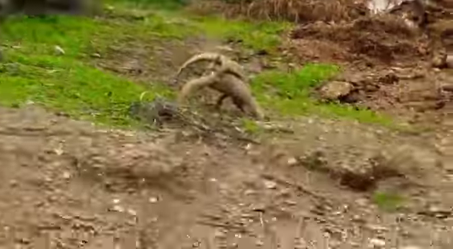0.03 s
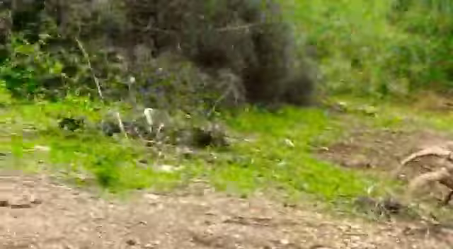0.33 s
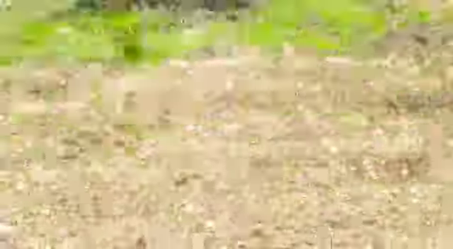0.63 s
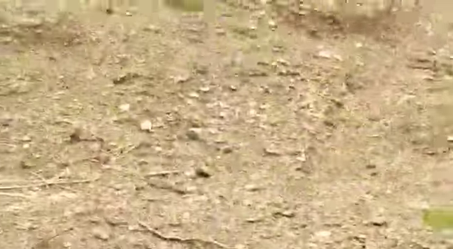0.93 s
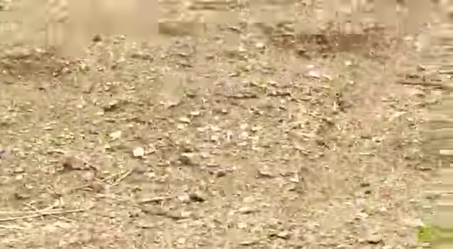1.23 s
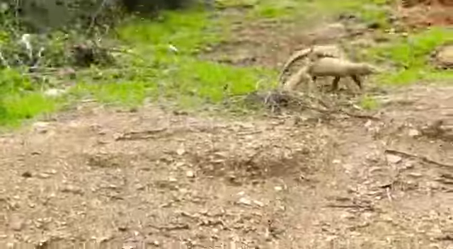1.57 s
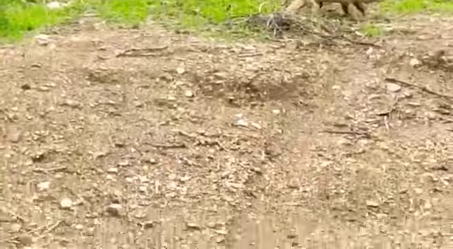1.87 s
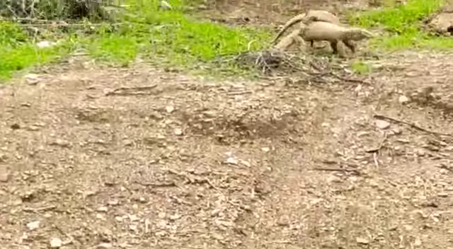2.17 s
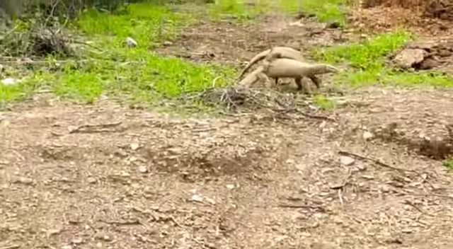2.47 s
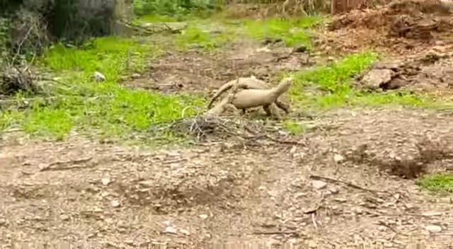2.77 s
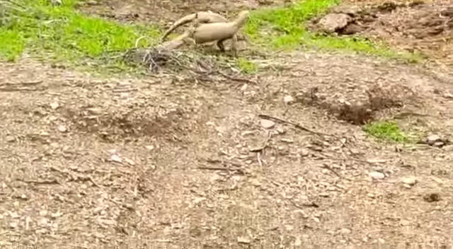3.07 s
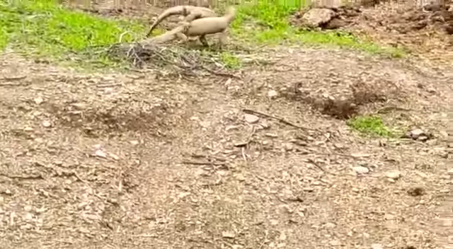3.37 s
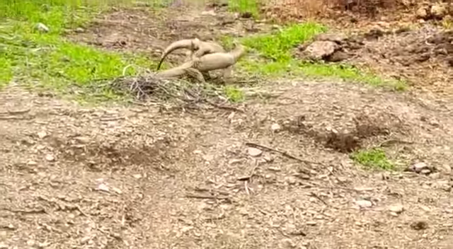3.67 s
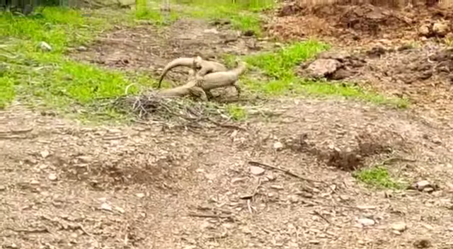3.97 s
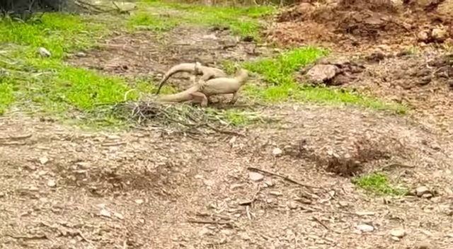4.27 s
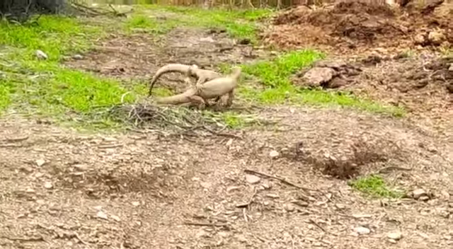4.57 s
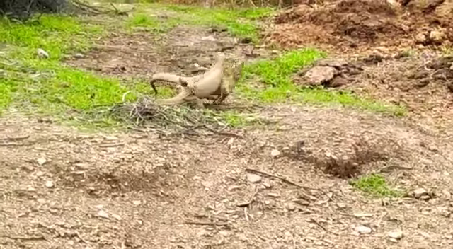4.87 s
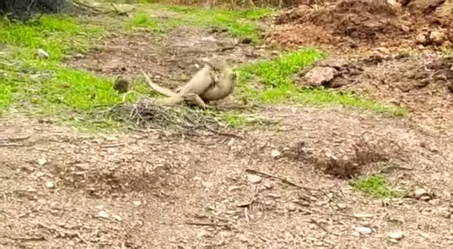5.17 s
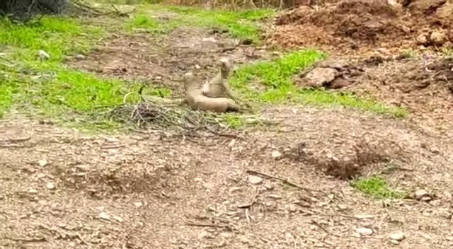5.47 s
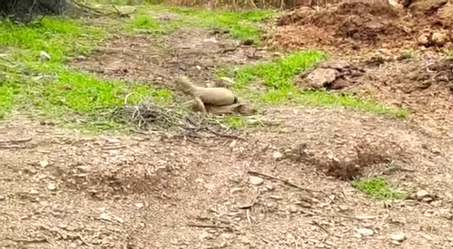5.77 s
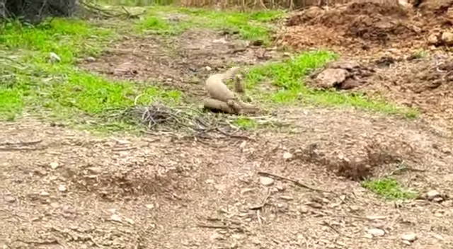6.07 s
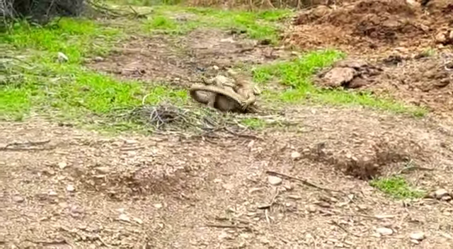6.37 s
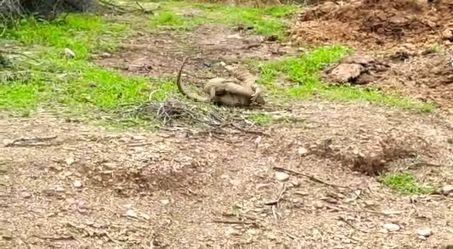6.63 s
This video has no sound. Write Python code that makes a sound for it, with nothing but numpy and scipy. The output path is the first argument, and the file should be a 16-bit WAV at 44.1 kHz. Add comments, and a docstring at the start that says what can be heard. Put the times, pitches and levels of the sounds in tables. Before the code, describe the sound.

Fingers click, rub and thump on a camera right at the microphone, loud enough to overload it briefly. The handling stops, leaving a quiet clearing with a soft hush of leaves. A small distant bird repeats faint, high rising whistles while wind buffets the microphone in low puffs. Toward the end two animals scuffle in dry litter with light crackles and twig snaps, and the wind returns.

```python
"""A quiet clearing, heard through a camera that is being handled. Fingers click on the case, rub it
with stick-slip friction and press on the microphone port until it overloads and pips. Wind buffets the
port in turbulent puffs, a small far bird gives rising whistles, and two animals scuffle in dry litter,
whose crackle is a sum of tiny impacts. Under it all lie a hush of distant leaves, blended birdsong
and two soft hums."""
import sys
import numpy as np
from scipy import signal
from scipy.fft import rfft, irfft, next_fast_len
from scipy.io import wavfile
from scipy.ndimage import uniform_filter1d, map_coordinates

SR = 44100
rng = np.random.default_rng(int(sys.argv[2]) if len(sys.argv) > 2 else 0)


def unload_audio(sound):
    """Save the sound as a 16-bit wav file, at the path given as the first command line argument."""
    columns = np.transpose(np.atleast_2d(sound))
    # keep every value between -1 and 1, then stretch to whole-number steps
    steps = np.round(np.clip(columns, -1, 1) * 32767)
    wavfile.write(sys.argv[1], SR, steps.astype(np.int16))


N = 295470

# Spectrum of distant leaves and birds: frequency_hz, density_db
HUSH_SPECTRUM = [(120, -32), (200, -3.5), (268, -11.5), (328, -10), (409, -16.5), (623, -17), (683, -18.5),
                 (821, -22), (1080, -25.5), (2510, -24.5), (4350, -26.5), (5420, -19), (7140, -25),
                 (10500, -25.5), (16000, -31)]
# Spectrum of many far birds blended: frequency_hz, density_db
CHORUS_SPECTRUM = [(3500, -52.5), (4600, -19.5), (5100, -5), (5500, 0), (5900, -14.5), (6350, 0.5),
                   (7100, -17), (9000, -75)]
# Soft wavering hums: centre_s, level_db, length_s, pitch_hz
HUMS = [(.04, -42, .12, 159.1), (6.261, -66, 0.93, 338.3)]
# Fingers catching on the case: start_s, level_db, pitch_hz
CLICKS = [(0.0851, -14.5, 11900), (0.09, -14.5, 3050), (0.1065, -9, 5480), (0.1147, -3.5, 990),
          (0.1276, -5, 3600), (.1329, -5, 5900), (0.1635, -28, 7154), (0.2175, -8.5, 4070),
          (.2190, -4, 5200), (.2894, -12, 9150), (0.3344, -8, 4630), (0.3471, -15.5, 2680),
          (.3596, -8, 1280), (0.3902, -14.5, 3000), (0.3915, -3, 860), (0.4129, -13.5, 8300),
          (.4910, -33, 2050), (.5180, -22.5, 890), (0.836, -36, 2420), (0.8443, -36.5, 8150),
          (0.8897, -12, 8700), (.8897, -6.5, 1980), (1.3988, -12.5, 680), (1.4071, -25, 906),
          (1.4802, -40.5, 4500), (1.566, -35, 6600), (1.6314, -34.5, 7730)]
# Skin sliding on the case: start_s, end_s, level_db
RUBS = [(.088, .135, -40), (.135, .19, -51), (.208, .232, -43.5), (.272, .33, -55), (.33, .37, -45),
        (.395, .435, -50), (.435, .555, -53.5), (.585, .685, -55), (.832, .975, -62.5),
        (1.065, 1.11, -61.5), (1.115, 1.21, -53.5), (1.24, 1.322, -50.5)]
# Spectrum of skin friction: frequency_hz, density_db
SKIN_SPECTRUM = [(150, -4), (350, 5), (700, -1), (1100, -4), (1600, -5), (2500, -10), (4800, -13.5),
                 (7000, -13.5), (14000, -16), (16000, -27)]
# Soft blows of the hand on the camera body: start_s, level_db, pitch_hz, t60_s
BUMPS = [(.0885, 0.5, 157, 0.0096), (.2112, -15, 473, 0.025), (.336, -4.5, 133, 0.028),
         (.365, -9.5, 89, 0.061), (.3925, -10, 77.5, 0.047), (.651, -14, 71, 0.028),
         (.781, -8.5, 59.6, 0.025), (.891, -10, 69.4, 0.053), (.976, -13, 51.4, 0.031),
         (1.226, -13.5, 81, 0.019), (1.299, -20.5, 79.5, 0.048), (1.3435, -15.5, 70.6, 0.013),
         (1.3975, 0, 125, 0.0089)]
# Spectrum of slow finger pressure on the port: frequency_hz, density_db
PRESSURE_SPECTRUM = [(4, -2), (10, 2.5), (28, -8), (50, -16.5), (100, -30.5), (200, -45), (500, -76.5),
                     (1000, -120)]
# Natural modes of the case: pitch_hz, level_db, t60_s
CASE_MODES = [(468, -0.5, 0.016), (759, -18.5, 0.032), (1381, -11.5, 0.019), (2460, -11.5, 0.015),
              (3320, -28, 0.029), (3870, -15, 0.019), (4791, -15.5, 0.017), (5319, -13, 0.026)]
# Pips under the hardest presses: start_s, level_db
OVERLOADS = [(0.656, -41.5), (0.704, -46), (0.786, -38.5), (0.894, -42), (.911, -47), (.981, -43),
             (1.227, -40), (1.3453, -44.5), (1.400, -41)]
# A far bird's series of whistles, slowing down: top_s, level_db
WHISTLES = [(1.675, -71), (1.895, -63), (2.115, -65), (2.35, -72.5), (2.585, -64.5), (2.82, -63.5),
            (3.066, -74), (3.314, -69), (3.59, -71), (4.165, -68), (4.509, -70.5)]
# Contour of one whistle around its highest pitch: from_top_s, pitch_hz, relative_db
WHISTLE_CONTOUR = [(-.14, 5630, -14.5), (-.06, 6064, -13), (-.02, 6480, -5), (0, 7010, -14),
                   (0.013, 6760, -2.5), (.035, 6710, -11)]
# Other birds' notes: centre_s, level_db, length_s, start_hz, end_hz
BIRD_NOTES = [(2.06, -61.5, 0.063, 6090, 6240), (2.447, -82, 0.32, 1780, 1770),
              (2.512, -65, .04, 5230, 4820), (2.554, -82.5, 0.69, 2610, 2585),
              (3.097, -69.5, .06, 6200, 6280), (3.345, -72, 0.029, 3050, 2900),
              (3.45, -70, .05, 4800, 4660), (3.533, -75.5, 0.33, 835, 825), (3.543, -77, 0.27, 2464, 2476),
              (4.238, -66, .06, 6470, 6580), (4.403, -74, .03, 3910, 4200), (4.512, -73, .03, 3940, 4040),
              (5.376, -65, .03, 5090, 4950), (5.401, -64.5, .03, 5170, 4790)]
# Moves of the animals in the litter: peak_s, level_db, rise_s, fall_s
ANIMAL_MOVES = [(2.85, -75, 0.16, .1), (2.984, -57.5, 0.025, 0.039), (3.83, -69.5, .15, .08),
                (4.1, -76, .03, 0.48), (4.76, -74, .04, 0.049), (4.89, -66, 0.0053, 0.09),
                (5.1, -63.5, 0.013, 0.086), (5.3, -70, .03, 0.052), (5.41, -63, 0.0046, 0.076),
                (5.51, -60, 0.028, 0.052), (5.88, -58, 0.33, .24), (6.161, -57, .02, .03),
                (6.46, -64, 0.21, 0.15)]
# Spectrum of crackling dry leaves: frequency_hz, density_db
LITTER_SPECTRUM = [(530, -36), (900, -9), (1880, -4.5), (2330, -10), (3680, -6), (4150, -17.5), (4920, -4),
                   (5480, -9.5), (9420, 1), (13400, -5), (16000, -14)]
# Twigs and grit snapping: start_s, peak_db, pitch_hz, quality_factor
SNAPS = [(1.9593, -41.5, 1504, 0.23), (2.9111, -49.5, 1520, 0.99), (2.9739, -49, 1400, 0.87),
         (4.0708, -44.5, 8240, 2.3), (4.6777, -45.5, 10890, 1.54), (4.7602, -44.5, 7170, 1.5),
         (4.8909, -49, 7960, 1), (5.4446, -46.5, 1576, 0.63), (5.4880, -44, 10000, 1.7),
         (5.5254, -46.5, 12800, 1.7), (5.627, -46.5, 1700, 0.7), (5.8797, -40, 12000, 1.1),
         (5.88, -50.5, 900, .4), (5.9055, -37, 3580, 3.4), (5.9062, -35, 10800, 1.2),
         (6.0445, -47, 9080, 2.5), (6.5940, -53, 13000, 1.7)]
# Feet scraping the soil: centre_s, level_db, half_width_s, centre_hz
SCUFFS = [(2.979, -66, 0.04, 2270), (4.754, -57.5, .03, 5986)]
# Gusts swelling over the breeze: peak_s, level_db, half_width_s
GUSTS = [(2.376, -43, 0.038), (2.533, -41, 0.099), (2.686, -34.5, 0.12), (2.865, -33, 0.13),
         (2.98, -32, 0.053), (3.136, -28.5, .05), (3.226, -33.5, 0.051), (3.382, -49.5, 0.066),
         (3.778, -54, 0.23), (5.624, -47.5, 0.1), (5.74, -38, .045), (5.831, -35.5, 0.046),
         (6.011, -44, 0.094), (6.63, -36, 0.093)]
# Spectrum of slow buffeting: frequency_hz, density_db
BUFFET_SPECTRUM = [(10, -20), (30, 4.5), (65, 2), (130, -6), (200, -16.5), (320, -33.5), (600, -67),
                   (1200, -100)]
# Spectrum of fast eddies: frequency_hz, density_db
EDDY_SPECTRUM = [(60, -25.5), (150, 8), (270, 3.5), (450, -9.5), (700, -29.5), (1100, -49), (2000, -60)]
# Single eddies hitting the port: centre_s, peak_db, pitch_hz
PUFFS = [(2.392, -32.5, 149.4), (2.506, -33.5, 127.6), (2.677, -26.5, 250), (2.796, -28.5, 204),
         (2.840, -25.5, 106.4), (2.885, -31, 300), (3.133, -19, 187), (3.139, -26, 215),
         (3.152, -19.5, 160), (3.227, -44, 257), (5.826, -27.5, 320), (6.005, -41, 150.4),
         (6.611, -32.5, 120), (6.652, -29, 180)]

TOUCH_S, GRIP_S, LET_GO_S = .11, .39, 1.39  # the hand rests on the port, grips, lets go


def amp(db):
    """Amplitude ratio of a level in decibels."""
    return 10 ** (np.asarray(db) / 20)


def unit(x):
    """Normalisation to rms 1."""
    return x / np.sqrt(np.mean(x ** 2) + 1e-20)


def add(track, start_s, sound):
    """Superposition: a sound adds to the track from start_s on."""
    start = round(start_s * SR)
    part = sound[max(-start, 0):max(N - start, 0)]
    track[max(start, 0):][:len(part)] += part


def wobble(rate_hz):
    """Slow random modulation: a spline through rate_hz Gaussian values a second."""
    return map_coordinates(rng.standard_normal(int(N * rate_hz / SR) + 4), [np.arange(N) * rate_hz / SR])


def envelope(start_s, end_s, attack_s, release_s):
    """Exponential growth up to start_s, a hold until end_s, then exponential decay."""
    t = np.arange(N) / SR
    return np.exp(np.minimum(t - start_s, 0) / attack_s - np.maximum(t - end_s, 0) / release_s)


def filtered(x, response):
    """Linear filtering: the spectrum of x is multiplied by a frequency response."""
    size = next_fast_len(len(x) + SR // 4)
    return irfft(rfft(x, size) * response(np.fft.rfftfreq(size, 1 / SR)), size)[:len(x)]


def coloured(x, spectrum):
    """Spectral shaping by a curve interpolated over log frequency, at rms 1."""
    knots_hz, db = np.transpose(spectrum)
    return unit(filtered(x, lambda hz: amp(np.interp(np.log(hz + 1), np.log(knots_hz + 1), db))))


def noise(spectrum):
    """Gaussian noise with a given spectral shape, at rms 1."""
    return coloured(rng.standard_normal(N), spectrum)


def resonance(x, hz, q):
    """Band-pass response of a damped oscillator with natural frequency hz and quality factor q."""
    return filtered(x, lambda f: 1j * f * hz / q / (hz ** 2 - f ** 2 + 1j * f * hz / q))


def grains(rate_hz, spread_db):
    """Shot noise: tiny random impacts of very unequal size, at rms 1."""
    sizes = amp(spread_db * np.minimum(rng.exponential(size=N), 4))
    return unit((rng.random(N) < rate_hz / SR) * sizes * rng.standard_normal(N))


def tone(pitch_hz, waver):
    """Frequency modulation: a sine strays from its pitch track by about the fraction waver."""
    unsteady_hz = pitch_hz * (1 + waver * wobble(150)[:len(pitch_hz)])
    return np.sin(2 * np.pi * np.cumsum(unsteady_hz) / SR)


def saturate(x, ceiling):
    """Soft clipping: linear for small signals, levelling off towards the ceiling."""
    return x / (1 + (x / ceiling) ** 6) ** (1 / 6)


def impacts(rows, grit, grit_life):
    """Impact excitation: a damped swing of the case, plus noise that lasts grit_life times as long."""
    out, t = np.zeros(N), np.arange(SR // 10) / SR
    for start_s, db, hz, t60_s in rows:
        swing = np.sin(2 * np.pi * hz * t) * amp(-60 * t / t60_s)
        hiss = resonance(resonance(rng.standard_normal(len(t)), hz, q=0.34), hz, q=0.17)
        crack = unit(hiss) * amp(-60 * t / (t60_s * grit_life))
        onset = 1 - np.exp(-t * hz * 12)  # softer, lower contacts take longer to build
        add(out, start_s, amp(db) * onset * (swing + grit * crack))
    return out


def distant_hush():
    """Incoherent summation: far leaves and birds merge into noise in which notes come and go."""
    spectrogram = signal.stft(noise(CHORUS_SPECTRUM), nperseg=1024)[2]
    patches = uniform_filter1d(rng.standard_normal(spectrogram.shape), size=3, axis=0)  # in frequency
    voices = unit(uniform_filter1d(patches, size=16, axis=1))  # and in time, to the length of a note
    chorus = unit(signal.istft(spectrogram * amp(4.4 * voices), nperseg=1024)[1][:N])
    hush = amp(-68 + 0.95 * wobble(2.6)) * noise(HUSH_SPECTRUM)
    return hush + amp(-78.5 + wobble(9.8)) * chorus


def hums():
    """Random frequency modulation makes a soft fundamental and its weak octave waver."""
    out = np.zeros(N)
    for centre_s, db, length_s, hz in HUMS:
        pitch_hz = np.full(int(length_s * SR), float(hz))
        hum = tone(pitch_hz, waver=0.065) + amp(-17.5) * tone(2 * pitch_hz, waver=0.024)
        add(out, centre_s - length_s / 2, amp(db) * np.sqrt(np.hanning(len(hum))) * hum)
    return out


def finger_clicks():
    """Damping grows with frequency: harder, higher contacts die away sooner."""
    t60_at_1khz_s = 0.0023
    rows = [(start_s, db, hz, t60_at_1khz_s * (hz / 1000) ** -0.46) for start_s, db, hz in CLICKS]
    return impacts(rows, grit=0.46, grit_life=1.5)


def skin_friction():
    """Sliding friction gives fine hiss with a few coarse catches; resting skin barely whispers."""
    resting = (TOUCH_S, LET_GO_S, -72.5)
    strokes = [amp(db) * envelope(start_s, end_s, attack_s=0.0045, release_s=0.0073)
               for start_s, end_s, db in [*RUBS, resting]]
    catches = grains(rate_hz=500, spread_db=4)
    texture = coloured(rng.standard_normal(N) + .45 * catches, SKIN_SPECTRUM)
    return np.max(strokes, axis=0) * amp(3 + 2.8 * wobble(80)) * texture


def port_pressure():
    """Saturation: finger pressure and soft blows drive the microphone beyond its linear range."""
    touch = amp(-29) * envelope(TOUCH_S, LET_GO_S, attack_s=.008, release_s=0.09)
    grip = amp(-14.5) * envelope(GRIP_S, LET_GO_S, attack_s=.03, release_s=0.022)
    pressure = np.maximum(touch, grip) * noise(PRESSURE_SPECTRUM)
    pressure += impacts(BUMPS, grit=0.3, grit_life=0.62)
    seal_s, leak_s = .1278, 0.025  # a fingertip shuts the port and the trapped pressure leaks away
    t = np.arange(SR // 4) / SR
    add(pressure, seal_s, amp(-10) * np.exp(-t / leak_s))
    return saturate(pressure, ceiling=.26)


def finger_stutter():
    """Stick-slip: a finger slips ever faster and harder, then leaves the case ringing in its modes."""
    first_slip_s, slip_hz, slip_t60_s, ring_s = .1991, 710, .008, .2154
    gaps_s = .0068 * .7 ** np.arange(5)
    starts_s = first_slip_s + np.cumsum([0, *gaps_s])
    slips = [(start_s, -12 + .5 * k, slip_hz, slip_t60_s) for k, start_s in enumerate(starts_s)]
    out = impacts(slips, grit=0.28, grit_life=0.94)
    t = np.arange(SR // 10) / SR
    ring = sum(amp(db - 60 * t / t60_s) * np.sin(2 * np.pi * hz * t) for hz, db, t60_s in CASE_MODES)
    add(out, ring_s, amp(-12) * ring)
    return out


def overload_pips():
    """Damped oscillation: the overloaded input whistles for a few milliseconds, with its octave."""
    pitch_hz, t60_s, attack_s = 6020, 0.015, 0.00091
    out, t = np.zeros(N), np.arange(SR // 20) / SR
    phase = 2 * np.pi * pitch_hz * t
    whistle = np.sin(phase) + amp(-5.5) * np.sin(2 * phase)
    pip = whistle * amp(-60 * t / t60_s) * (1 - np.exp(-t / attack_s))
    for start_s, db in OVERLOADS:
        add(out, start_s, amp(db) * pip)
    return out


def birds():
    """Whistles and notes are gliding pure tones; scattering by the bushes adds a reverberant tail."""
    calls = np.zeros(N)
    from_top_s, contour_hz, contour_db = np.transpose(WHISTLE_CONTOUR)
    t = np.arange(from_top_s[0], from_top_s[-1], 1 / SR)
    for top_s, db in WHISTLES:
        pitch_hz = np.interp(t, from_top_s, contour_hz) * (1 + rng.normal(0, 0.0029))
        gain = amp(db + np.interp(t, from_top_s, contour_db))
        add(calls, top_s + t[0], gain * tone(pitch_hz, waver=.005))
    for centre_s, db, length_s, start_hz, end_hz in BIRD_NOTES:
        note = tone(np.linspace(start_hz, end_hz, int(length_s * SR)), waver=0.0094)
        add(calls, centre_s - length_s / 2, amp(db) * np.hanning(len(note)) * note)
    t, t60_s = np.arange(SR // 2) / SR, 0.38
    tail = rng.standard_normal(len(t)) * amp(-60 * t / t60_s)
    return calls + amp(-8) * signal.fftconvolve(calls, tail / np.linalg.norm(tail))[:N]


def animals_in_litter():
    """Impulsive noise: dry leaves crackle under each move, twigs snap and feet scrape the soil."""
    crackle = grains(rate_hz=3500, spread_db=2.5) + .6 * grains(rate_hz=260, spread_db=3)
    moves = [amp(db) * envelope(peak_s, peak_s, rise_s, fall_s)
             for peak_s, db, rise_s, fall_s in ANIMAL_MOVES]
    out = np.linalg.norm(moves, axis=0) * coloured(crackle, LITTER_SPECTRUM)  # moves add in power
    t, snap_t60_s = np.arange(SR // 20) / SR, 0.024
    for start_s, db, hz, q in SNAPS:
        burst = rng.standard_normal(len(t)) * amp(-60 * t / snap_t60_s)
        snap = unit(resonance(resonance(burst, hz, q), hz, q)) + .35 * unit(burst)
        add(out, start_s + 0.00092, amp(db) * snap / np.abs(snap).max())
    for centre_s, db, half_width_s, hz in SCUFFS:
        stroke = np.exp(-((np.arange(N) / SR - centre_s) / half_width_s) ** 2)
        scrape = unit(resonance(grains(rate_hz=4000, spread_db=3), hz, q=0.26))
        out += amp(db) * stroke * scrape
    return out


def wind_gusts():
    """Turbulence: gusts over a breeze buffet the port and shed fast eddies at the pressure peaks."""
    t = np.arange(N) / SR
    gusts = [amp(db) * np.exp(-((t - peak_s) / half_width_s) ** 2) for peak_s, db, half_width_s in GUSTS]
    breeze = amp(-59)
    strength = np.hypot(breeze, np.linalg.norm(gusts, axis=0))
    buffet = noise(BUFFET_SPECTRUM)
    rumble = amp(3 + 1.1 * wobble(28)) * strength * buffet
    eddies = unit((0.24 + np.abs(buffet)) * amp(1.8 * wobble(60)) * noise(EDDY_SPECTRUM))
    eddy_gain = amp(-38.5) * (strength / amp(-30)) ** 1.7  # eddies grow 1.7 dB per dB of wind
    return rumble + eddy_gain * eddies


def wind_puffs():
    """A single eddy hits the port as a band-limited pulse: it holds nothing finer than its own size."""
    out, t = np.zeros(N), np.arange(-SR // 20, SR // 20) / SR
    half_width_s = 0.0055
    for centre_s, db, hz in PUFFS:
        burst = rng.standard_normal(len(t)) * np.exp(-(t / half_width_s) ** 2)
        puff = filtered(burst, lambda f: f * np.exp(-.5 * (f / hz) ** 2))
        add(out, centre_s + t[0], amp(db) * puff / np.abs(puff).max())
    return out


def scene():
    """Superposition: all sources add at the one microphone."""
    hand = port_pressure() + skin_friction() + finger_clicks() + finger_stutter() + overload_pips()
    clearing = wind_gusts() + wind_puffs() + animals_in_litter() + birds() + hums() + distant_hush()
    return (hand + clearing)[None]


def record(dry):
    """Soft clipping and band limiting: the camera rounds the sharpest peaks and cuts the top treble."""
    clipped = saturate(dry[0], ceiling=.5)
    return filtered(clipped, lambda hz: hz < 16200)[None]


dry = scene()
out = record(dry)
unload_audio(out)
```